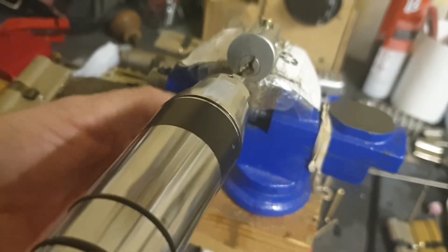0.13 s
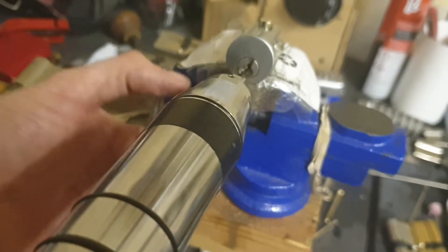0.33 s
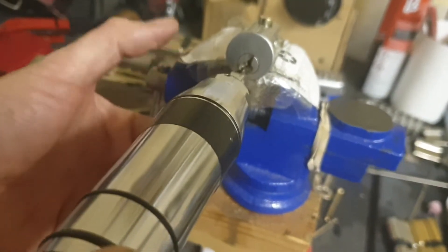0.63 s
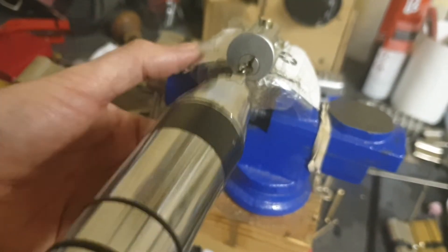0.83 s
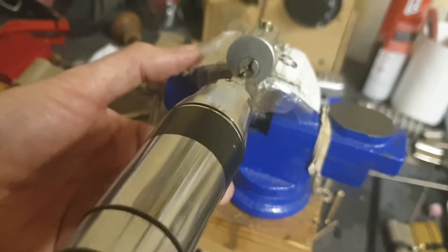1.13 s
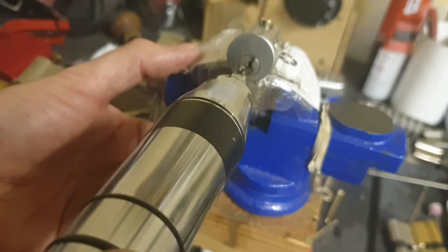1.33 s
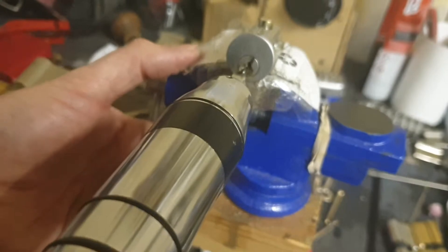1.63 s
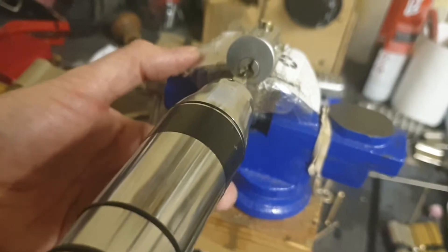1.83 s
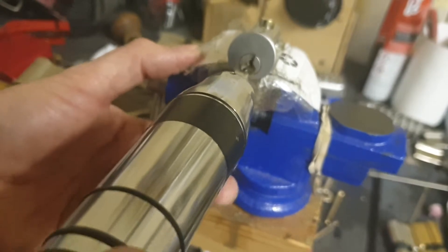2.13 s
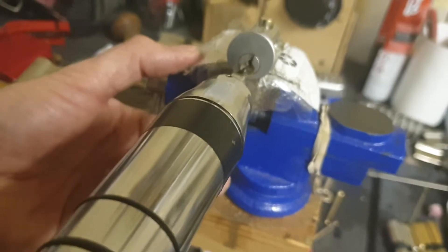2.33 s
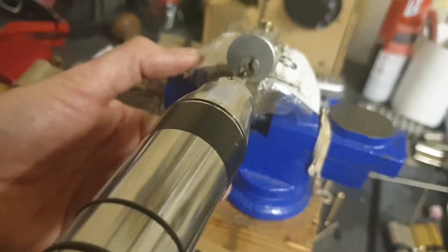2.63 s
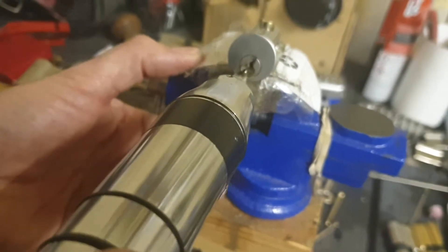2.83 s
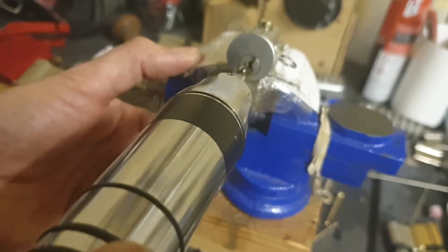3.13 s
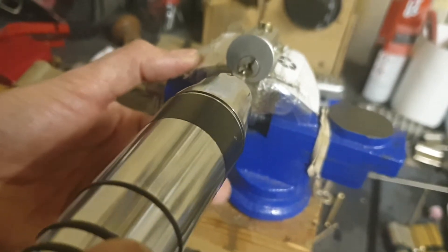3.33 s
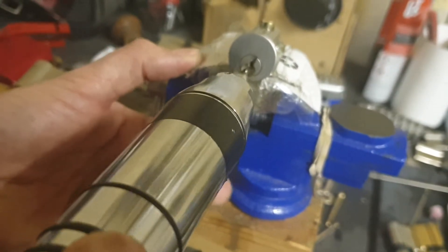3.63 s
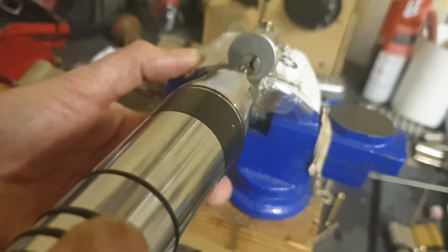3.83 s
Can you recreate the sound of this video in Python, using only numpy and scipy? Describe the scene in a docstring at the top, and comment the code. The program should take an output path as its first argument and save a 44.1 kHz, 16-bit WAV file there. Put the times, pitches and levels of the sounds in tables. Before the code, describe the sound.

An electric pick gun rattles in a lock, close by in a small workshop. After faint needle ticks, a short harsh buzz runs from about 0.4 to 0.7 seconds and slows into separate clacks by 0.9. Light ticks lead into a long metallic buzzing rattle from 1.1 seconds until the end at 4, wavering slightly in pitch, with a bright scraping edge, the tool's low hum and faint room rumble.

```python
"""At a workshop bench, close by, an electric pick gun rattles in a lock held in a vise:
one short burst that coasts to a stop, then a long run. Every motor turn throws the steel needle
against the pins and back, so the impacts fuse into a buzz at the turning rate: a thud of the lock,
a knock with the needle's own note, a ringing return and a scrape. The gun's body hums in forced
vibration, and the needle ticks in the keyway before each start, over a low room rumble."""
import sys
import numpy as np
from scipy import signal
from scipy.fft import rfft, irfft, next_fast_len
from scipy.io import wavfile

SR = 44100
rng = np.random.default_rng(int(sys.argv[2]) if len(sys.argv) > 2 else 0)


def master(y):
    """Save y as 16-bit WAV."""
    cut = np.clip(np.atleast_2d(y).T, -1, 1)
    pcm = np.round(cut * 32767)  # scale
    wavfile.write(sys.argv[1], SR, pcm.astype(np.int16))


N = 176400
T = np.arange(N) / SR
FFT_SIZE = next_fast_len(N + SR)
HZ = np.fft.rfftfreq(FFT_SIZE, 1 / SR)
BURST_START_S, BURST_END_S, RUN_START_S = .446, .748, 1.1335

# Motor speed in the burst and in the run. Each row: time in seconds, turns per second.
BURST_SPEED = [(0.446, 120.6), (.5, 104.5), (.55, 125), (.64, 126), (.69, 111), (.74, 89)]
RUN_SPEED = [(1.13, 90.7), (1.165, 108.4), (1.34, 124.1), (1.41, 124.9), (1.515, 115.6), (1.725, 122.7),
             (1.865, 114.8), (2.04, 118.7), (2.215, 107.5), (2.25, 121.0), (2.32, 109.7), (2.425, 118.2),
             (2.53, 113.3), (2.565, 118.4), (2.67, 109.9), (2.705, 118.1), (2.775, 113.0), (2.915, 125.2),
             (2.985, 124.8), (3.055, 119.2), (3.195, 130.0), (3.37, 130.4), (3.475, 125.1), (3.51, 112.5),
             (3.545, 120.3), (3.65, 125.3), (3.72, 123.2), (3.79, 105.7), (3.86, 115.5), (3.895, 111.3),
             (4.0, 128.0)]
# Response of the struck lock cylinder. Each row: frequency in Hz, gain in dB.
LOCK_SPECTRUM = [(300, -18), (780, 11.5), (1300, 12.5), (1600, -13), (2500, -32.5)]


def amp(db):
    """Decibels to amplitude ratio."""
    return 10 ** (np.asarray(db) / 20)


def rms(x):
    """Root mean square."""
    return np.sqrt(np.mean(x ** 2) + 1e-20)


def fade(t, t60):
    """Exponential decay, 60 dB in t60 seconds."""
    return np.exp(-np.log(1000) * t / t60)


def over_frequency(points):
    """Interpolation of (Hz, value) points on a logarithmic frequency axis."""
    hz, values = np.transpose(points)
    return np.interp(np.log(HZ + 1), np.log(hz + 1), values)


def over_time(rows):
    """Linear interpolation in time: one curve for each column after the first."""
    times, *columns = np.transpose(rows)
    return [np.interp(T, times, column) for column in columns]


def filtered(x, response):
    """Linear filtering: the spectrum of x times a frequency response."""
    return irfft(rfft(x, FFT_SIZE) * response, FFT_SIZE)[..., :N]


def minimum_phase(points):
    """Causal response of the given (Hz, dB) shape, by folding the cepstrum."""
    cepstrum = irfft(np.log(amp(over_frequency(points))), FFT_SIZE)
    cepstrum[1:FFT_SIZE // 2] *= 2
    cepstrum[FFT_SIZE // 2:] = 0
    return np.exp(rfft(cepstrum))


def ringing(x, t60, size=8192):
    """Dense modes ring as decaying noise, here drawn anew for each side and overlapping block."""
    decay = fade(T[:size], t60)
    window = np.sin(np.pi * np.arange(size) / size)
    padded = np.pad(x, [(0, 0), (size, size)])
    out = np.zeros((2, N + 4 * size))
    for i in range(0, N + size, size // 2):
        ring = rng.standard_normal((2, size)) * decay / np.linalg.norm(decay)
        out[:, i:i + 2 * size - 1] += signal.fftconvolve(padded[:, i:i + size] * window, ring, axes=1)
    return out[:, size:size + N]


def at_microphone(x, left_lead_s=.00013):
    """Time and level cues of direction: the left side hears first, and each has its own colour."""
    # Each row: frequency in Hz, level of left over right in dB.
    balance = [(400, 1.5), (2300, 0), (2900, 7.5), (3700, 2.5), (4600, -0.5), (5400, -6.5), (7300, -8),
               (9600, 7.5), (11000, 4), (12200, -2), (13500, -7)]
    side = np.array([[.5], [-.5]])
    time_shift = np.exp(2j * np.pi * HZ * side * left_lead_s)
    return filtered(x, amp(side * over_frequency(balance)) * time_shift)


def pulse_train(speed, start, until, hits, scatter_db, count=400):
    """Quasi-periodic excitation: blows at set places in each turn, uneven in time and strength."""
    rate, = over_time(speed)
    turns = np.cumsum(rate) / SR
    turns -= np.interp(start, T, turns)
    out, taps = np.zeros(N), np.arange(-8, 9)
    for place, db, jitter_ms in hits:
        lateness, strength = rng.standard_normal((2, count))
        due = np.interp(np.arange(count) + place, turns, T)
        onset = due + lateness * jitter_ms / 1000
        gain = amp(db + scatter_db * strength) * (due < until) / np.sqrt(np.interp(onset, T, rate))
        # A windowed sinc places each blow between samples.
        index = np.round(onset * SR).astype(int)[:, None] + taps
        offset = index - onset[:, None] * SR
        shape = np.sinc(offset) * np.cos(np.pi * offset / (len(taps) + 1)) ** 2
        out += np.bincount(np.clip(index, 0, N - 1).ravel(), (gain[:, None] * shape).ravel(), N)
    return out


def room_rumble():
    """Steady low noise of the workshop, largely coherent between the two sides."""
    # Each row: frequency in Hz, gain in dB.
    spectrum = [(35, -53), (54, 3.5), (75, -16), (150, -16.5), (600, -35), (2000, -59), (16000, -59)]
    white = rng.standard_normal(N) + .44 * rng.standard_normal((2, N))
    noise = filtered(white, amp(over_frequency(spectrum)))
    return amp(-54) * noise / rms(noise)


def keyway_ticks():
    """Free decay: a touch on the pins before a start gives a sharp tick, then a faint ring of steel."""
    # Each row: start in seconds, relative level in dB.
    touches = [(0.187, -48.5), (0.37, -37.5), (0.418, -31.5), (1.06, -43), (1.089, -23.5), (1.118, -16)]
    # Each row: frequency in Hz, gain in dB.
    spectrum = [(300, -12.5), (900, -8), (3000, -7), (3800, -2), (7400, -10.5), (8600, -6.5),
                (16000, -13.5)]
    power = np.zeros(N)
    for start, db in touches:
        age = np.maximum(T - start, 0)
        decay = fade(age, t60=.0042) + amp(-8) * fade(age, t60=.22)
        power += (T >= start) * (amp(db) * decay) ** 2
    noise = filtered(rng.standard_normal(N), minimum_phase(spectrum))
    return amp(-4.5) * at_microphone(np.sqrt(power) * noise / rms(noise))


def body_hum(cutoff_hz=700):
    """Forced vibration: one shove per turn drives the low resonances of gun and vise."""
    # Each row: frequency in Hz, bandwidth in Hz, gain in dB.
    modes = [(84.6, 7.1, -2), (124.9, 22, 0.5), (249.2, 7.3, 3), (470, 120, -30)]
    # Each row: time in seconds, level in dB.
    levels = [(.6, -40.5), (1.3, -37), (3.1, -40), (3.3, -51), (3.6, -40)]
    shove = [(.05, 0, .21)]  # place in turns, strength in dB, jitter in ms
    force = pulse_train(BURST_SPEED, BURST_START_S, BURST_END_S, shove, scatter_db=4)
    force += pulse_train(RUN_SPEED, RUN_START_S, T[-1], shove, scatter_db=2)
    response = sum(amp(db) * 1j * HZ * width / (hz ** 2 - HZ ** 2 + 1j * HZ * width)
                   for hz, width, db in modes)
    hum = filtered(force, response / (1 + (HZ / cutoff_hz) ** 4))
    return amp(over_time(levels)[0]) * at_microphone(hum / rms(hum[T > RUN_SPEED[0][0]]))


def coasting_strokes(rebound_s=.011, rebound_db=-2, thump_hz=102):
    """At a low rate impacts are heard singly: a clack and rebound, a lock thud, a thump of the gun."""
    # Each row: start in seconds, then relative levels of clack, thud and thump in dB.
    strokes = [(0.7514, -27, -26, -36), (0.763, -21, -32, -44), (0.776, -20.5, -34, -34),
               (.792, -26, -27, -38), (.8095, -25, -27, -33), (.8305, -23.5, -25.5, -40),
               (.854, -26.5, -40, -29.5), (.8985, -26.5, -36, -35)]
    # Each row: frequency in Hz, gain in dB.
    clack_spectrum = [(300, -6.5), (2500, 0), (10000, -9.5), (16000, -8)]
    envelope, blows, thump = np.zeros((3, N))
    for start, clack_db, thud_db, thump_db in strokes:
        for onset, db in (start, clack_db), (start + rebound_s, clack_db + rebound_db):
            envelope += (T >= onset) * amp(db) * fade(np.maximum(T - onset, 0), t60=.013)
        blows[round(start * SR)] = amp(thud_db)
        age = np.maximum(T - start, 0)
        thump += amp(thump_db) * np.sin(2 * np.pi * thump_hz * age) * fade(age, t60=.098)
    noise = filtered(rng.standard_normal(N), minimum_phase(clack_spectrum))
    clack = envelope * noise / rms(noise)
    lock = minimum_phase(LOCK_SPECTRUM)
    thud = filtered(blows, lock) / abs(irfft(lock)).max()
    return at_microphone(amp(1.5) * clack + amp(1) * thud + amp(2) * thump)


def contact(hits, spectrum, burst_db, run_levels, scatter_db, chatter_db, chatter_t60,
            ring_db, ring_t60, burst_hits=None):
    """Source and filter: blows, their chatter of tiny rebounds and the steel's ring share a spectrum."""
    blows = pulse_train(BURST_SPEED, BURST_START_S, BURST_END_S, burst_hits or hits, scatter_db)
    blows += pulse_train(RUN_SPEED, RUN_START_S, T[-1], hits, scatter_db)
    power_decay = fade(T[:SR // 8], chatter_t60) ** 2
    envelope = np.sqrt(abs(signal.fftconvolve(blows ** 2, power_decay / power_decay.sum())[:N]))
    rebounds = (rng.standard_normal(N) + rng.standard_normal((2, N))) / np.sqrt(2)
    force = blows + amp(chatter_db) * envelope * rebounds
    vibration = force + amp(ring_db) * ringing(force, ring_t60)
    sound = at_microphone(filtered(vibration, minimum_phase(spectrum)))
    # Burst and run each follow their own level curve.
    in_burst = (T > BURST_START_S) & (T < BURST_END_S)
    in_run = T > (BURST_END_S + RUN_START_S) / 2
    mid = sound.mean(0)
    run_gain = amp(over_time(run_levels)[0]) / rms(mid[in_run])
    return sound * np.where(in_run, run_gain, amp(burst_db) / rms(mid[in_burst]))


def lock_thud(burst_db):
    """Impact excitation: the lock cylinder answers the blows with a dull midrange resonance."""
    # Each row: place in turns, strength in dB, jitter in ms.
    run_hits = [(0.6715, 4, 0.021), (0.015, -5, 0.073)]
    burst_hits = [(.05, 0, .02)]
    # Each row: time in seconds, relative level in dB.
    run_levels = [(1.14, -38.5), (3.98, -41.5), (4.0, -48)]
    return contact(run_hits, LOCK_SPECTRUM, burst_db, run_levels, scatter_db=.8,
                   chatter_db=-20, chatter_t60=.025, ring_db=-15, ring_t60=.02, burst_hits=burst_hits)


def pin_knock(burst_db):
    """A brief contact has a broad spectrum: the needle knocks hard against the pins."""
    # Each row: place in turns, strength in dB, jitter in ms.
    hits = [(.01, 0, .012), (.13, -8, .09), (.55, -14, .08)]
    # Each row: frequency in Hz, gain in dB.
    spectrum = [(500, -31.5), (2100, -1), (3300, 0), (4600, -12.5), (8000, -36)]
    # Each row: time in seconds, relative level in dB.
    run_levels = [(1.4, -31), (2.2, -34)]
    return contact(hits, spectrum, burst_db, run_levels, scatter_db=1.2,
                   chatter_db=-11, chatter_t60=.014, ring_db=-11, ring_t60=.02)


def needle_note(burst_db):
    """Resonance: the struck needle sounds its own note, a narrow band near 3 kHz."""
    # Each row: place in turns, strength in dB, jitter in ms.
    hits = [(.03, 0, .022), (.56, -14, .08)]
    # Each row: frequency in Hz, gain in dB.
    spectrum = [(2200, -31), (2830, -1.5), (3030, 2.5), (3700, -35.5)]
    # Each row: time in seconds, relative level in dB.
    run_levels = [(1.14, -36), (1.15, -35), (4.0, -32.5)]
    return contact(hits, spectrum, burst_db, run_levels, scatter_db=1.2,
                   chatter_db=-10, chatter_t60=.014, ring_db=-16, ring_t60=.02)


def return_ring(burst_db):
    """High modes of the steel ring twice a turn, as the needle flies out and returns."""
    # Each row: place in turns, strength in dB, jitter in ms.
    hits = [(.08, 0, .3), (.54, -2, .1)]
    # Each row: frequency in Hz, gain in dB.
    spectrum = [(3000, -18), (5200, -6.5), (6200, -18), (7100, -4.5), (7500, -1.5), (8100, -14),
                (12000, -31)]
    # Each row: time in seconds, relative level in dB.
    run_levels = [(2.8, -33), (3.2, -32)]
    return contact(hits, spectrum, burst_db, run_levels, scatter_db=.5,
                   chatter_db=1, chatter_t60=.016, ring_db=-2, ring_t60=.018)


def tip_scrape(burst_db):
    """Friction noise: at the scraping tip, tiny rebounds outweigh the blows and make a bright hiss."""
    # Each row: place in turns, strength in dB, jitter in ms.
    hits = [(.07, 0, .2), (.16, -1, .25), (.58, -7, .15)]
    # Each row: frequency in Hz, gain in dB.
    spectrum = [(1500, -23), (4000, -10), (6300, -12.5), (8500, -18.5), (9700, -3), (12500, -3),
                (14000, -3), (16000, -12)]
    # Each row: time in seconds, relative level in dB.
    run_levels = [(1.14, -29), (2.51, -29.5), (4.0, -32)]
    return contact(hits, spectrum, burst_db, run_levels, scatter_db=1,
                   chatter_db=10, chatter_t60=.0048, ring_db=-1, ring_t60=.049)


def needle_rattle():
    """Superposition of five contact sounds, whose strengths drift as the hand shifts the needle."""
    # Each row: time in seconds, then relative levels of thud, knock, note, ring and scrape in dB.
    burst_levels = [(.45, -41, -39.5, -37, -34, -32.5), (.51, -36, -30.5, -31.5, -30.5, -27),
                    (.58, -34.5, -39.5, -46.5, -34, -28), (.74, -38, -39.5, -52, -39, -35.5)]
    thud_db, knock_db, note_db, ring_db, scrape_db = over_time(burst_levels)
    return (amp(1.5) * lock_thud(thud_db) + amp(1) * pin_knock(knock_db)
            + amp(.5) * (needle_note(note_db) + return_ring(ring_db) + tip_scrape(scrape_db)))


def scene():
    """Direct sound of the steel and its short reverberation in a small room, over hum and rumble."""
    steel = needle_rattle() + coasting_strokes() + keyway_ticks()
    return steel + amp(-9) * ringing(steel, t60=.3) + body_hum() + room_rumble()


def record(dry, top_hz=15850, edge_hz=200):
    """Band limiting: a steep low-pass removes the highest treble."""
    return filtered(dry, np.clip((top_hz - HZ) / edge_hz + .5, 0, 1))


dry = scene()
out = record(dry)
master(out)
```